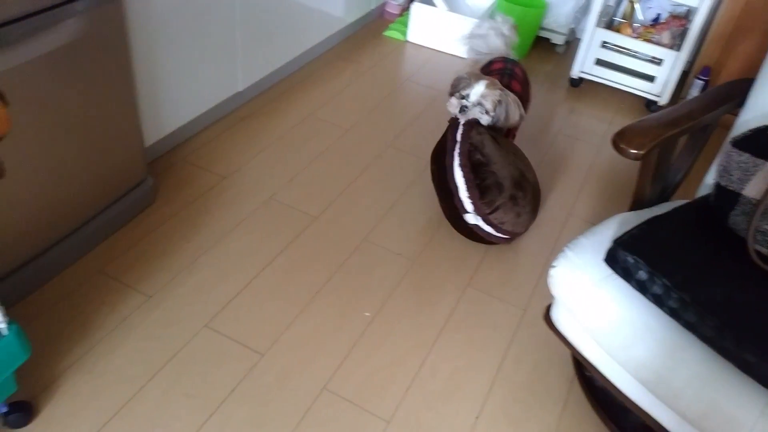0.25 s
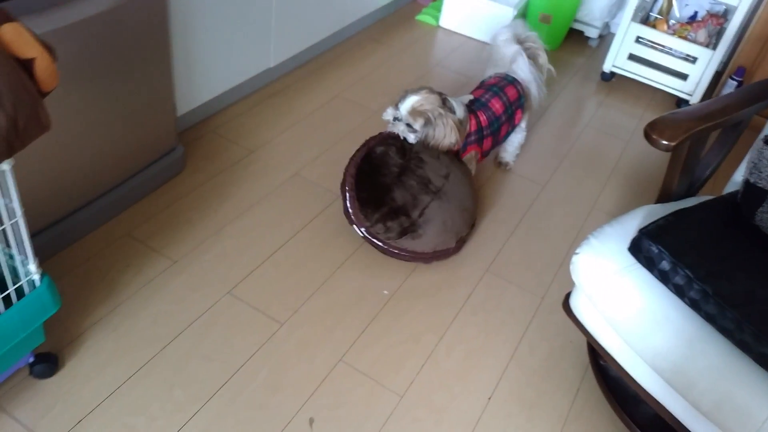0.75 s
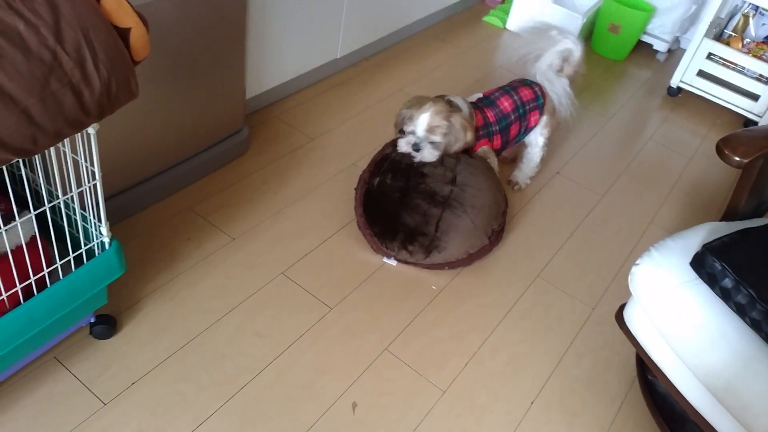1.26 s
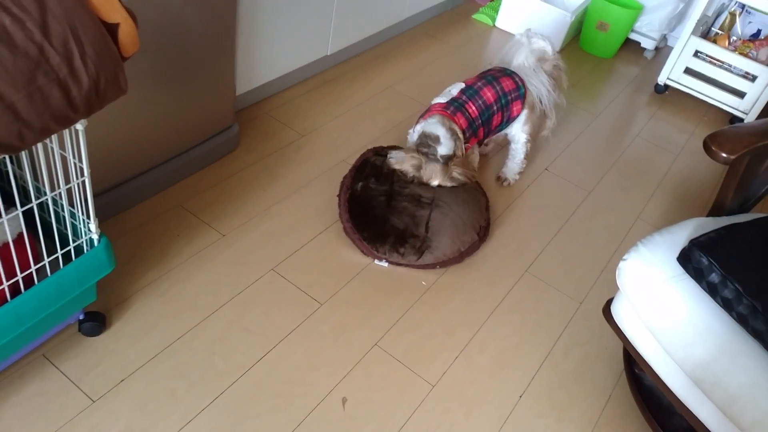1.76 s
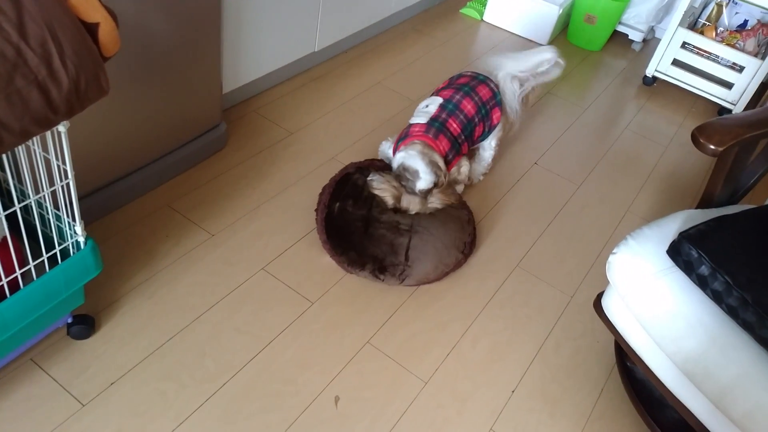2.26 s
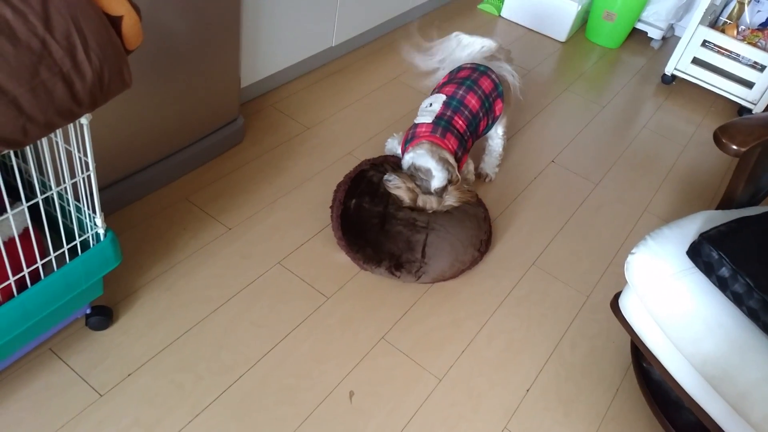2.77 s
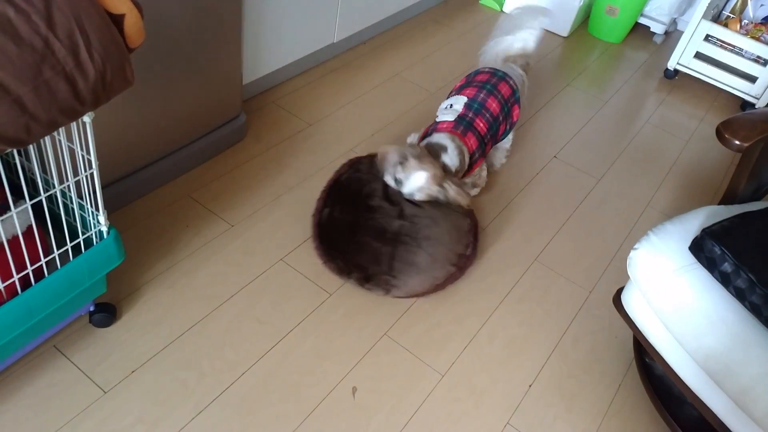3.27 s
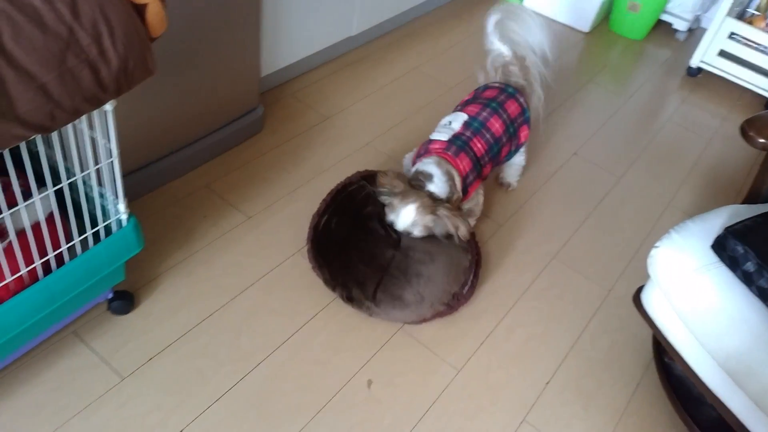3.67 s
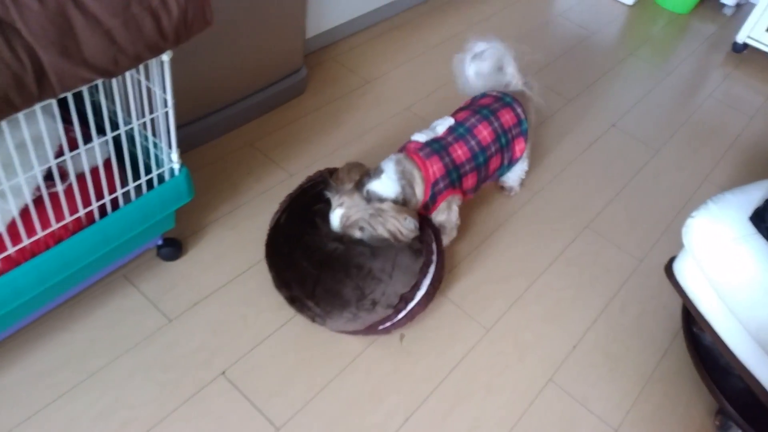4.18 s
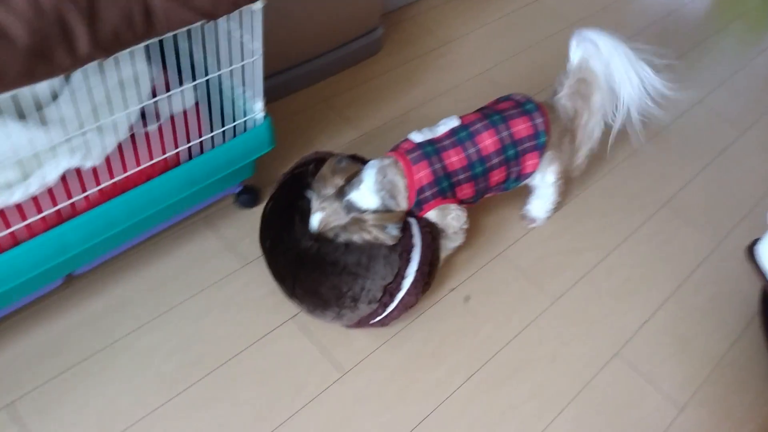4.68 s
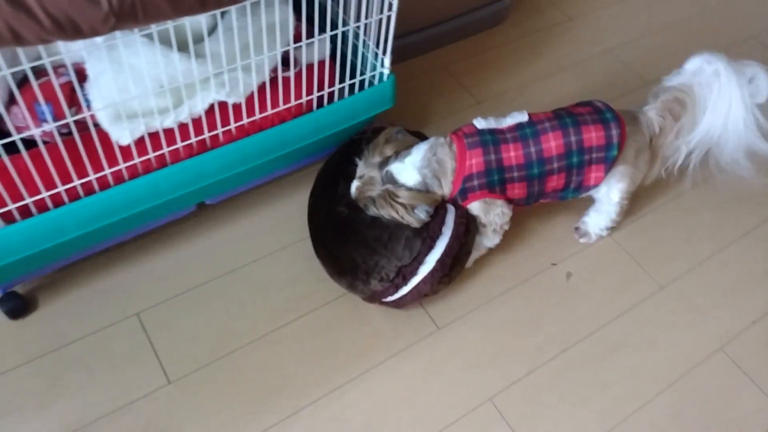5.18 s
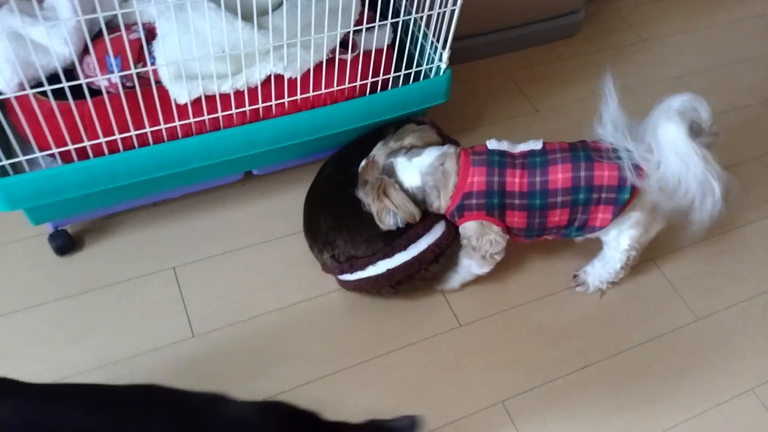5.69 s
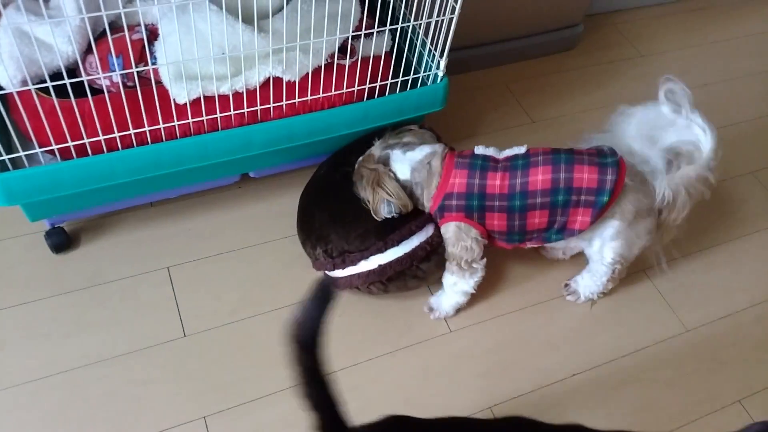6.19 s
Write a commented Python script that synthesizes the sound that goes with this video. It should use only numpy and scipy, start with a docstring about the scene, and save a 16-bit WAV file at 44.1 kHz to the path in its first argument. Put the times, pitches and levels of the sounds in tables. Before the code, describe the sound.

A small dog's claws tap and scrape on a wooden floor as it shoves a plush cushion along, with dull thumps.

```python
"""A low hum, a faint hiss and the swish of a plush cushion sliding over a wooden living-room floor.
A small dog is shoving the cushion along, and the plush rubs and catches on the boards.
Its claws scrape as they stick and slip, and tap as they land; its furry paws brush the wood.
Dull thumps come through the floor, and the sounds of the paws echo off furniture and walls."""
import sys
import numpy as np
from scipy import signal
from scipy.io import wavfile
from scipy.ndimage import uniform_filter1d

SR = 44100
rng = np.random.default_rng(int(sys.argv[2]) if len(sys.argv) > 2 else 0)


def generate_wav(signal):
    """Clip the signal to [-1, 1] and save it as 16-bit WAV at the path in sys.argv[1]."""
    frames = np.transpose(np.atleast_2d(signal))
    scaled = np.clip(frames, -1, 1) * 32767
    pcm = np.round(scaled).astype(np.int16)
    wavfile.write(sys.argv[1], SR, pcm)


N = 284004
TIME = np.arange(N) / SR


def gain_of(db):
    """Turns decibels into a number to multiply a sound by."""
    return 10 ** (np.asarray(db) / 20)


def unit_level(x):
    """Scales a signal to an average (rms) level of 1."""
    return x / np.sqrt(np.mean(x ** 2) + 1e-20)


def level_curve(points):
    """Joins rows of (time [s], level [dB]) into a gain for every sample."""
    return gain_of(np.interp(TIME, *np.transpose(points)))


def add(mix, time_s, sound):
    """Mixes a sound in at the given time."""
    start = round(time_s * SR)
    sound = sound[max(-start, 0):]
    part = mix[max(start, 0):][:len(sound)]
    part += sound[:len(part)]


def ring(tone, tilt_db=0, ripple_db=0, size=2048):
    """One click with this tone, brighter by tilt_db per octave; ripple varies it like spots on a floor."""
    hz = np.fft.rfftfreq(size, 1 / SR) + 1
    tone_hz, tone_db = np.transpose(tone)
    ripple = unit_level(uniform_filter1d(rng.standard_normal(len(hz)), size=26))
    db = np.interp(np.log(hz), np.log(tone_hz), tone_db)
    db += tilt_db * np.log2(np.maximum(hz, tone_hz[0])) + ripple_db * ripple
    log_gain = np.log(gain_of(np.r_[db, db[-2:0:-1]]))
    spectrum = np.exp(np.conj(signal.hilbert(log_gain)))  # makes the click start sharply, then fade
    click = np.fft.ifft(spectrum).real
    return click / np.linalg.norm(click)


def noise(tone):
    """Steady noise with the given tone."""
    white = rng.standard_normal(N + 8191)
    return unit_level(signal.fftconvolve(white, ring(tone, size=8192), "valid"))


def flutter(depth_db, seconds):
    """A gain that wavers at random; more seconds make it slower."""
    window = np.hanning(int(seconds * SR) + 3)
    drift = signal.fftconvolve(rng.standard_normal(N), window, "same")
    return gain_of(depth_db * unit_level(drift))


# How loud the hum is: (time [s], level [dB])
HUM_LEVELS = [(0, -39.5), (2.4, -44.5), (2.8, -48.5), (5.1, -50.5), (5.6, -48.5), (6.44, -55.5)]
def hum(pitch_hz=59.3):
    """One low note that wavers and slowly gets quieter."""
    note = np.sqrt(2) * np.sin(2 * np.pi * pitch_hz * TIME)
    return note * level_curve(HUM_LEVELS) * flutter(depth_db=3.5, seconds=0.093)


# The tone of the room's still air: (frequency [Hz], level [dB])
AIR_TONE = [(20, -27), (45, 14), (80, 9.5), (150, -17), (300, -9.5), (700, -25), (1500, -22.5), (3500, -35),
            (5000, -78), (5900, -58.5), (7300, -72), (11000, -55.5), (16000, -47.5)]
def still_air(level_db=-60):
    """The quiet room: a soft rumble with a faint hiss on top."""
    return gain_of(level_db) * noise(AIR_TONE)


# The slide swells with each shove: (time [s], level [dB])
SLIDE_LEVELS = [(0.0, -58.5), (0.95, -56), (1.74, -61.5), (2.08, -56.5), (2.51, -61), (2.91, -64.5),
                (3.16, -61), (3.3, -59.5), (4.2, -58), (4.32, -57.5), (5.31, -58.5), (5.45, -54.5),
                (6.17, -62), (6.44, -58)]
# The tone of plush on wood: (frequency [Hz], level [dB])
PLUSH_TONE = [(60, -1), (110, 13), (200, 5.5), (320, 2), (520, -2), (850, -3), (1300, -13), (2500, -18.5),
              (6000, -29.5), (12000, -31)]
def cushion(rub_db=4, bumps_db=-1, bumps_per_s=22, uneven_db=3, cutoff_hz=650):
    """Plush rubs over the boards and catches in small, soft bumps."""
    catches = rng.random(N) < bumps_per_s / SR
    sizes = gain_of(uneven_db * np.minimum(rng.exponential(1, N), 2)) * rng.choice([-1, 1], N)
    softened = signal.sosfilt(signal.butter(4, cutoff_hz, fs=SR, output="sos"), catches * sizes)
    bumps = unit_level(signal.oaconvolve(softened, ring(PLUSH_TONE))[:N])
    rub = noise(PLUSH_TONE) * flutter(depth_db=1.92, seconds=0.07)
    return level_curve(SLIDE_LEVELS) * (gain_of(rub_db) * rub + gain_of(bumps_db) * bumps)


# The woody tone of a claw dragged along the grain: (frequency [Hz], level [dB])
DRAG_TONE = [(300, -31), (900, -21), (1500, -18), (2700, -12), (4600, -7), (5300, -3), (5850, 3), (6300, 0),
             (7200, -12), (8900, -11), (10500, -23), (13800, -27), (14800, -28.5), (16500, -40.5)]
def add_skid(mix, peak_s, rise_s, fall_s, db, tilt_db, slips_per_s=2200, uneven_db=2.5):
    """A skidding claw sticks and slips, making a swell of tiny, uneven clicks."""
    t = np.arange(-3 * rise_s, 5 * fall_s, 1 / SR)
    push = np.exp(np.where(t < 0, -(t / rise_s) ** 2, -t / fall_s))
    sizes = gain_of(uneven_db * np.minimum(rng.exponential(1, len(t)), 4)) * rng.choice([-1, 1], len(t))
    slips = unit_level(sizes * (rng.random(len(t)) < slips_per_s / SR))
    skid = signal.fftconvolve(slips * push, ring(DRAG_TONE, tilt_db, ripple_db=1.8))
    add(mix, peak_s + t[0], gain_of(db) * skid)


# Claw scrapes: (time of hardest push [s], length [s], level [dB], brightness [dB per octave])
CLAW_PUSHES = [(.004, 0.011, -37.5, -1), (0.258, 0.019, -38, -0.5), (0.384, 0.026, -53.5, -3),
               (0.516, 0.023, -39, 2), (0.662, 0.017, -44, -0.5), (0.806, 0.017, -45, 0),
               (1.019, 0.26, -54.5, 2.5), (1.346, 0.03, -51, -6.5), (1.471, 0.061, -44, -2),
               (1.996, 0.023, -47.5, 1.5), (2.173, 0.042, -53, -9.5), (2.213, 0.018, -44.5, -5),
               (2.466, 0.05, -41.5, -2.5), (3.004, .07, -73, 12), (3.292, 0.055, -53.5, 5),
               (3.388, .04, -48.5, 0.5), (3.418, .026, -34, -2.5), (3.671, 0.019, -46.5, -3.5),
               (3.904, 0.057, -46.5, -2.5), (4.157, 0.016, -45.5, -4), (4.446, 0.018, -34.5, -3),
               (4.706, 0.033, -42, -3.5), (4.857, 0.15, -50.5, 0.5), (4.903, .025, -42.5, -0.5),
               (4.975, 0.017, -34, -3), (5.235, 0.041, -45.5, -3.5), (5.463, .044, -28.5, 0),
               (5.678, .03, -35.5, 0), (6.270, 0.036, -51.5, -3.5), (6.38, 0.054, -39, 0)]
def pushing_skids(rise_share=0.6, fall_share=0.28):
    """The claws skid over the boards each time the dog pushes."""
    out = np.zeros(N)
    for time_s, length_s, db, tilt_db in CLAW_PUSHES:
        add_skid(out, time_s, rise_share * length_s, fall_share * length_s, db, tilt_db)
    return out


def fur_brushing(skids, swell_s=0.05, relative_db=-12.5):
    """Furry paws brush the boards around every skid, louder when the claws are busier."""
    decay = np.exp(-1 / (swell_s * SR))
    skid_level = signal.filtfilt([1 - decay], [1, -decay], abs(skids), padtype="even", padlen=SR)
    roughness = flutter(depth_db=3, seconds=0.01)
    return gain_of(relative_db) * skid_level * noise(DRAG_TONE) * roughness


def room_echo(sound, furniture_s=0.17, walls_s=0.55, walls_db=-10, echoes_per_s=5000, dull_hz=17000):
    """Quick echoes off furniture, then a weaker, longer tail off the walls; high notes die sooner."""
    t = np.arange(SR * 3 // 4) / SR
    echoes = rng.choice([-1, 1], len(t)) * (rng.random(len(t)) < echoes_per_s / SR)
    echoes = echoes * (t > 0.0033)  # a short wait before the first echo
    echoes = echoes * gain_of(4.5 * rng.standard_normal(len(t)))  # some are louder than others
    hz, slice_s, spectra = signal.stft(echoes, SR, nperseg=128)
    age = slice_s * (1 + (hz[:, None] / dull_hz) ** 2)
    fade = gain_of(-60 * age / furniture_s) + gain_of(walls_db - 60 * age / walls_s)
    tail = signal.istft(spectra * fade, SR)[1]
    return signal.oaconvolve(sound, tail / np.linalg.norm(tail))[:N]


def moving_echoes(sound, places=7, stay_s=0.13):
    """The dog moves about, so its sounds take turns through several patterns of echoes."""
    place = (TIME // stay_s) % places
    return sum(room_echo(sound * (place == k)) for k in range(places))


# Paws landing: (time [s], force [dB], extra level of the click that comes straight to the ear [dB])
PAW_LANDINGS = [(0.1341, -20.5, -6), (.462, -23.5, -3), (.969, -41, 6), (1.0271, -22, 4), (1.250, -23, -5),
                (1.782, -27.5, -11), (1.858, -44.5, 9.5), (2.275, -12.5, -8.5), (2.559, -24, -2),
                (3.115, -47, 6), (3.492, -14, 3), (3.4991, -16, 4.5), (3.811, -28, 6), (4.019, -11.5, 0),
                (4.291, -18.5, -3), (4.559, -26.5, -1), (4.603, -18.5, -7), (4.794, -20.5, 1),
                (4.884, -20.5, 0.5), (4.896, -20.5, 0), (5.0799, -11.5, -1), (5.318, -23.5, 3),
                (5.342, -22, 0), (5.510, -13.5, 0.5), (5.580, -7, 6), (5.657, -18, 0), (5.809, -18, 6.5),
                (5.825, -16.5, -1)]
# The tone of a claw hitting wood, with the low pat of the pad: (frequency [Hz], level [dB])
CLAW_TONE = [(250, -24), (800, -17), (1500, -16.5), (2700, -14), (4600, -8), (5300, -0.5), (5850, 4.5),
             (6300, 1), (7200, -10.5), (8700, -7), (10500, -18.5), (13800, -19.5), (14800, -21),
             (16500, -29)]
def claw_taps(claws=4, spread_s=0.003, later_db=-2, extra_tilt_db=0.06):
    """Each landing gives a quick cluster of claw clicks, and a single click for the room to echo."""
    direct, to_room = np.zeros((2, N))
    for time_s, force_db, direct_db in PAW_LANDINGS:
        tilt_db = 0.5 + 0.081 * force_db  # softer landings are duller
        lags = np.r_[0, (np.arange(1, claws) - rng.random(claws - 1)) / (claws - 1)]
        for lag in lags:
            size = gain_of(force_db + direct_db + later_db * lag) * rng.choice([-1, 1])
            click = ring(CLAW_TONE, tilt_db + extra_tilt_db, ripple_db=2.5)
            add(direct, time_s + lag * spread_s, size * click)
        # the room blurs the separate claws into one blow
        add(to_room, time_s, gain_of(force_db) * ring(CLAW_TONE, tilt_db, ripple_db=3.5))
    return direct, to_room


def landing_skids(rise_s=0.005, fall_s=0.014, relative_db=-26.5):
    """Each paw skids a little just after it lands."""
    out = np.zeros(N)
    for time_s, force_db, _ in PAW_LANDINGS:
        add_skid(out, time_s + 2 * rise_s, rise_s, fall_s, force_db + relative_db, tilt_db=-0.5)
    return out


# Soft blows on the floor; harder ones reach higher: (time [s], peak level [dB], top frequency [Hz])
FLOOR_BLOWS = [(0.185, -20.5, 222), (0.294, -20, 600), (0.606, -29, 295), (0.776, -19, 346),
               (.938, -30, 280), (1.041, -32.5, 302), (3.1156, -18.5, 1230), (3.9167, -20, 430),
               (4.684, -13.5, 1300), (5.011, -35, 600), (5.5357, -17.5, 1000), (6.245, -42, 550)]
# The tone of the boards under a soft blow: (frequency [Hz], level [dB])
BOARD_TONE = [(22, -59.5), (50, -10), (80, -1), (110, 3), (150, -4.5), (200, -8), (280, -15.5),
              (400, -21.5), (510, -30.5), (700, -24.5), (1300, -31), (4000, -65)]
def floor_thumps(boom_hz=63, boom_db=-10, boom_fade_s=0.24, boom_delay_s=0.009):
    """A soft blow makes a dull knock, and the boards boom briefly after it."""
    out = np.zeros(N)
    t = np.arange(SR // 3) / SR
    boom = np.sin(2 * np.pi * boom_hz * t) * gain_of(boom_db - 60 * t / boom_fade_s)
    for time_s, db, top_hz in FLOOR_BLOWS:
        knock = ring(BOARD_TONE, ripple_db=1.5, size=8192)
        knock = signal.sosfilt(signal.butter(4, top_hz, fs=SR, output="sos"), knock)
        add(out, time_s, gain_of(db) * knock / abs(knock).max())
        add(out, time_s + boom_delay_s, gain_of(db) * boom)
    return out


def scene(tap_echo_db=6, skid_direct_db=-3):
    """Mixes the paws and their echoes with the thumps, cushion, hum and air, in one channel."""
    taps, taps_to_room = claw_taps()
    skids = pushing_skids() + landing_skids()
    skids = skids + fur_brushing(skids)
    echoes = moving_echoes(gain_of(tap_echo_db) * taps_to_room + skids)
    paws = taps + gain_of(skid_direct_db) * skids + echoes
    return (paws + floor_thumps() + cushion() + hum() + still_air())[None]


def record(dry, top_hz=17300):
    """Cuts away the very highest treble."""
    treble_cut = signal.firwin(255, top_hz, window=("kaiser", 9), fs=SR)
    return signal.oaconvolve(dry, treble_cut[None], "same")


dry = scene()
out = record(dry)
generate_wav(out)
```